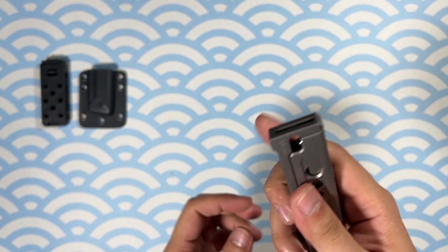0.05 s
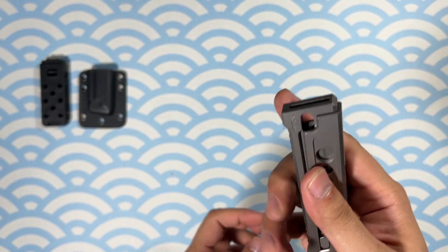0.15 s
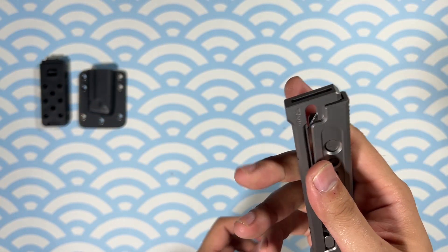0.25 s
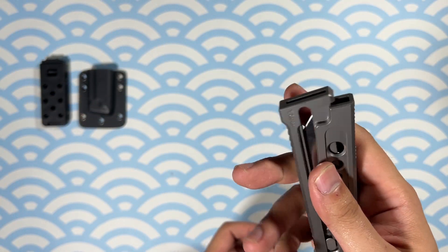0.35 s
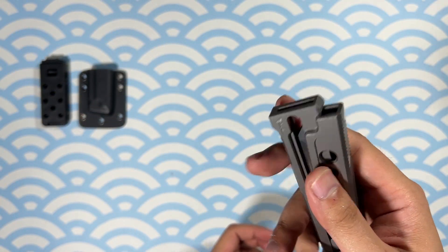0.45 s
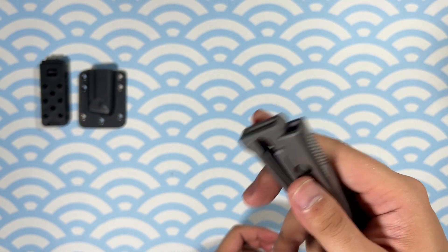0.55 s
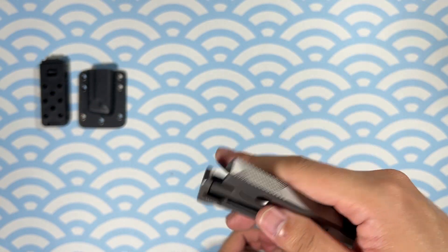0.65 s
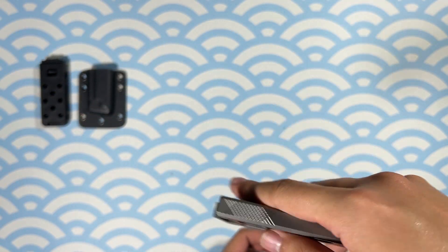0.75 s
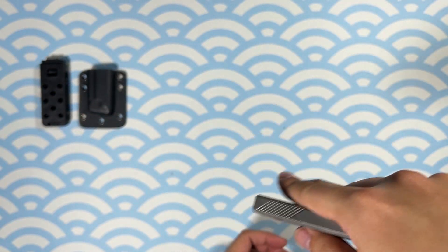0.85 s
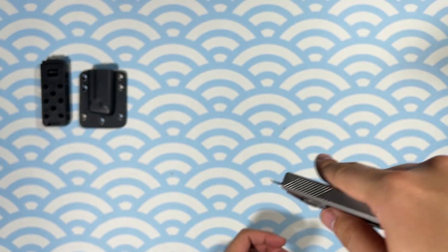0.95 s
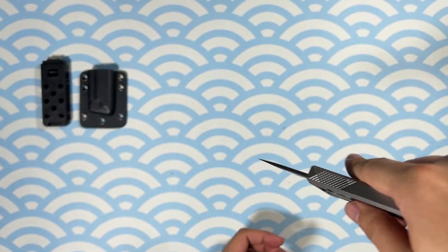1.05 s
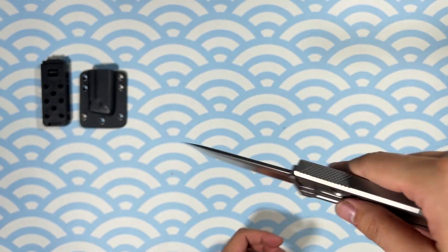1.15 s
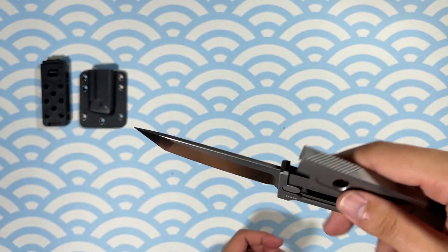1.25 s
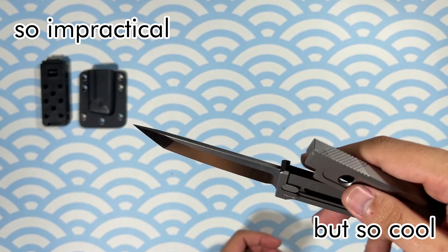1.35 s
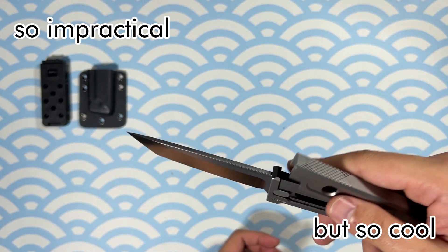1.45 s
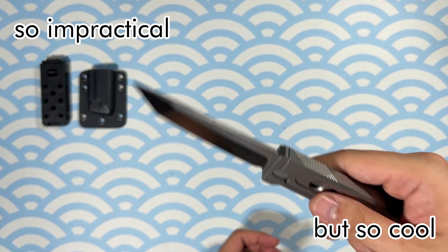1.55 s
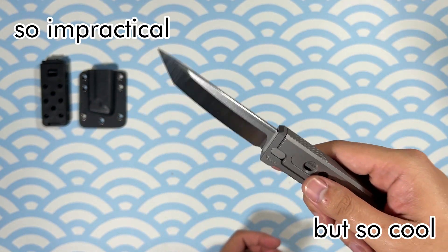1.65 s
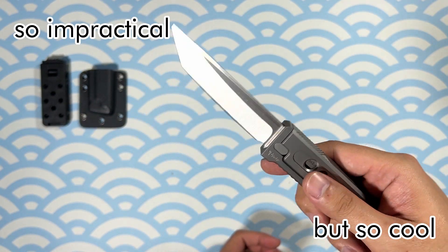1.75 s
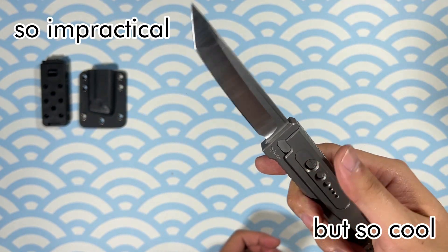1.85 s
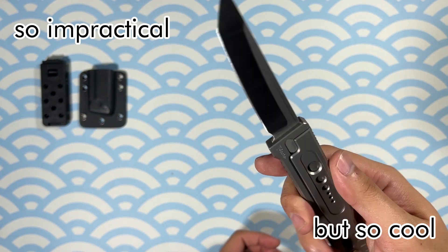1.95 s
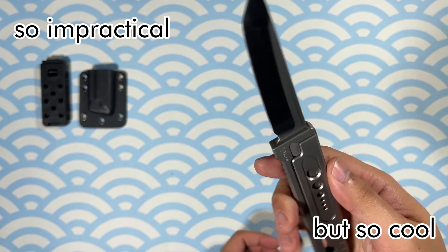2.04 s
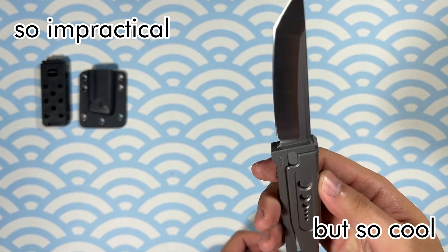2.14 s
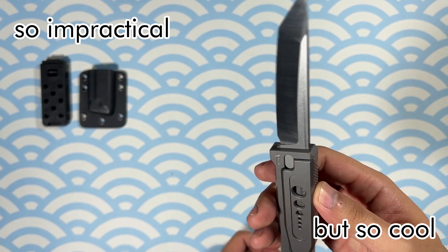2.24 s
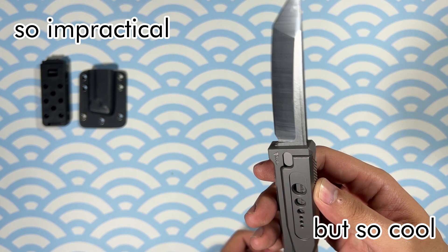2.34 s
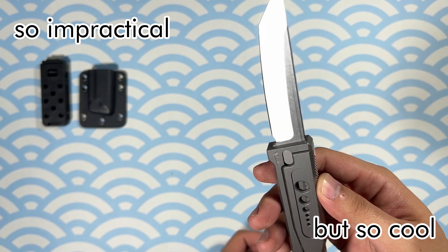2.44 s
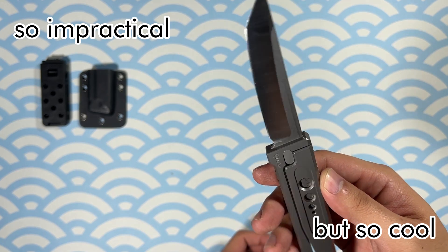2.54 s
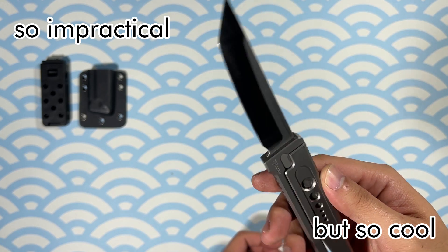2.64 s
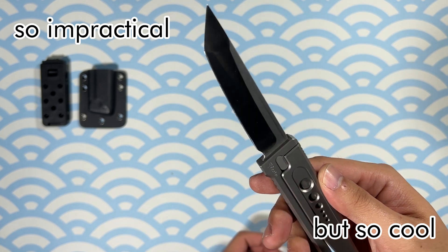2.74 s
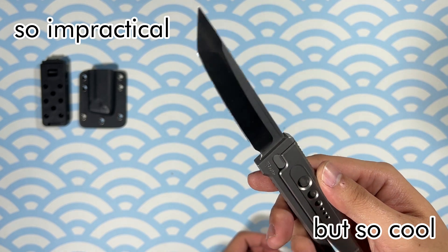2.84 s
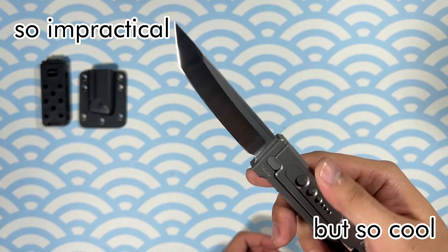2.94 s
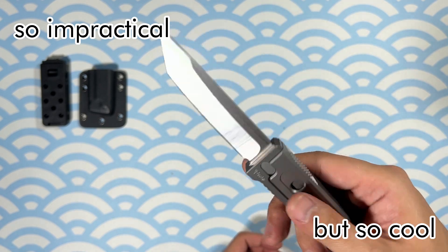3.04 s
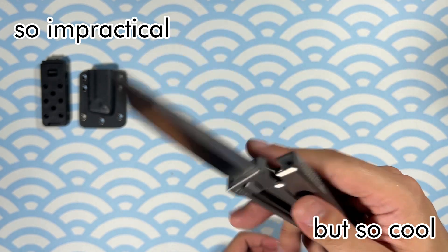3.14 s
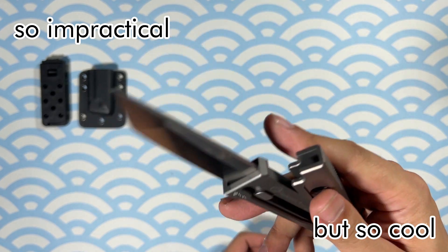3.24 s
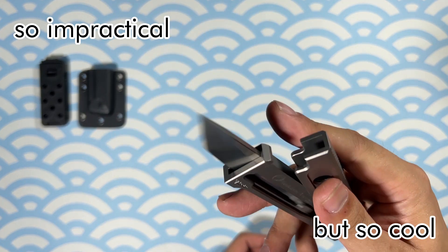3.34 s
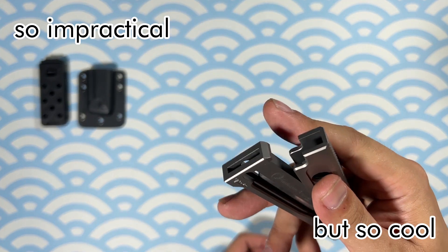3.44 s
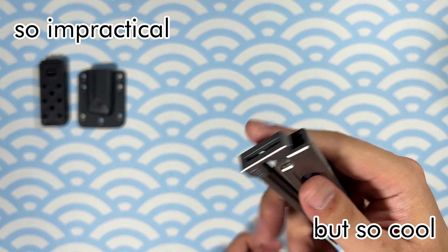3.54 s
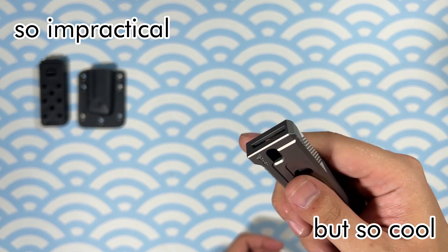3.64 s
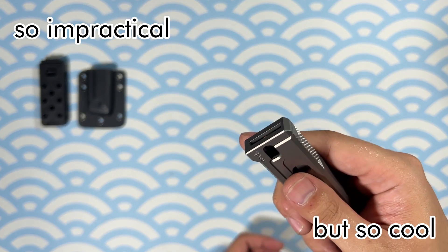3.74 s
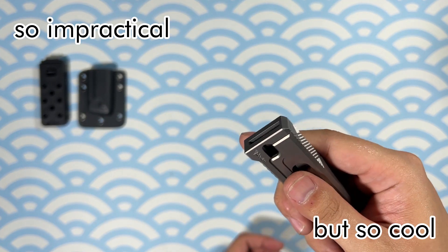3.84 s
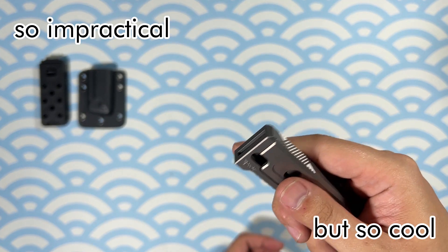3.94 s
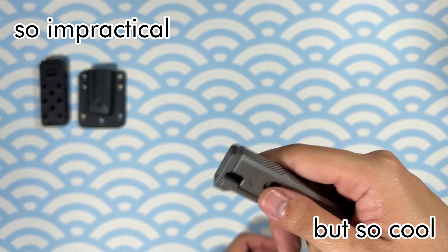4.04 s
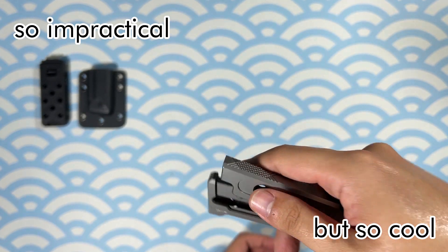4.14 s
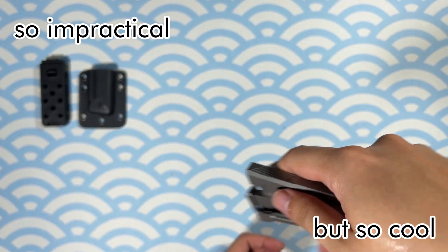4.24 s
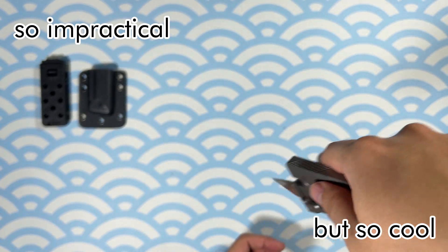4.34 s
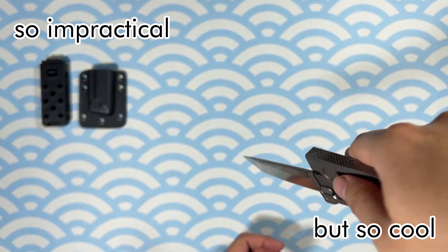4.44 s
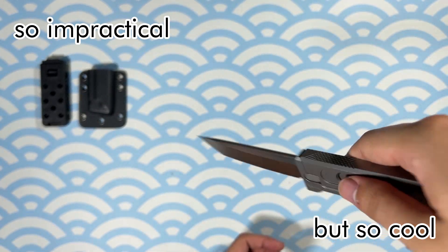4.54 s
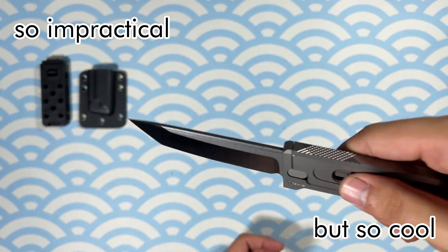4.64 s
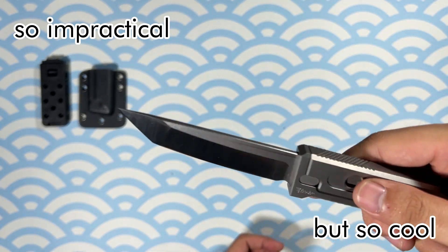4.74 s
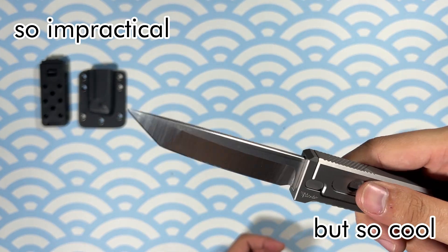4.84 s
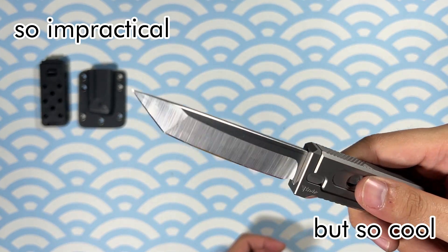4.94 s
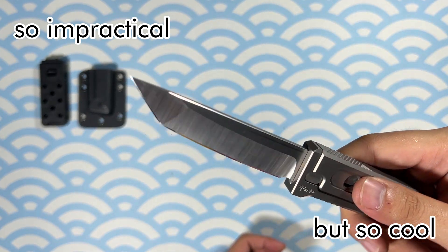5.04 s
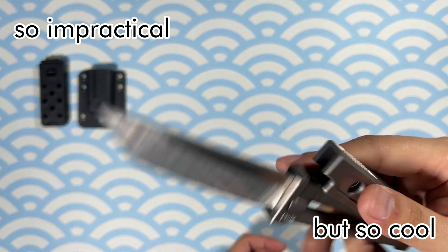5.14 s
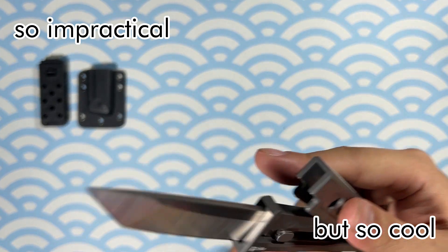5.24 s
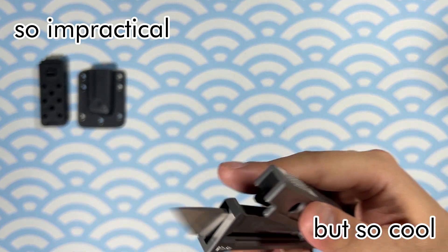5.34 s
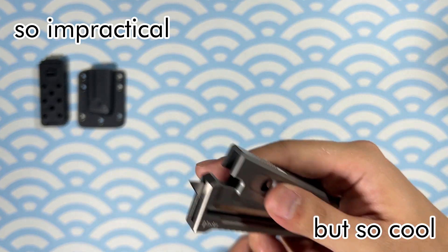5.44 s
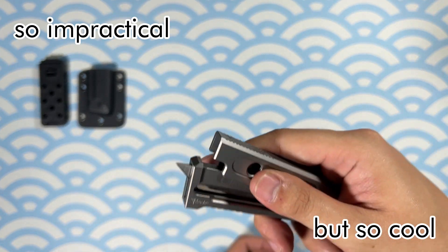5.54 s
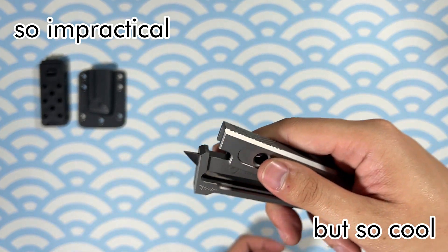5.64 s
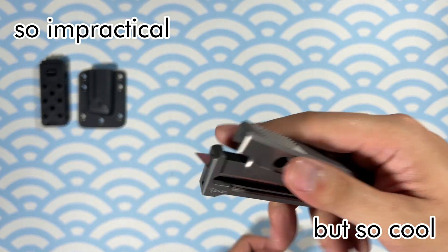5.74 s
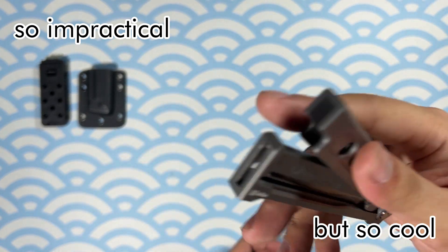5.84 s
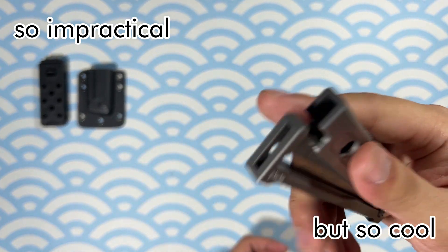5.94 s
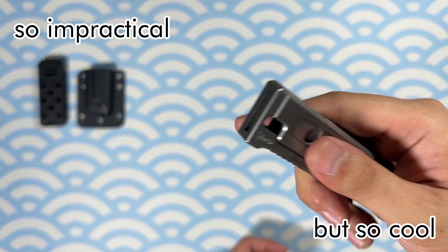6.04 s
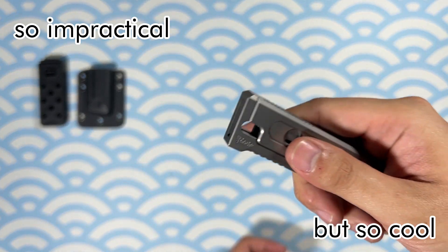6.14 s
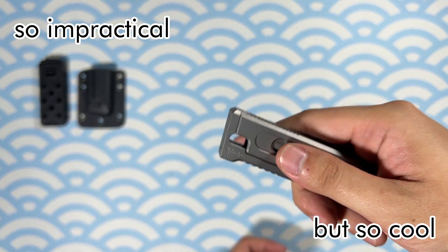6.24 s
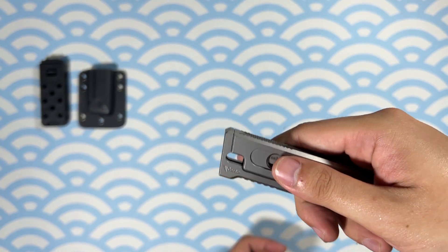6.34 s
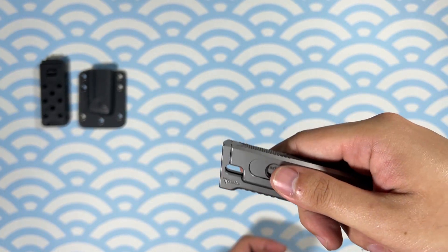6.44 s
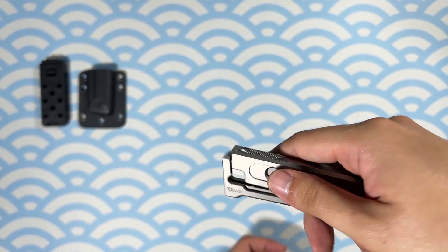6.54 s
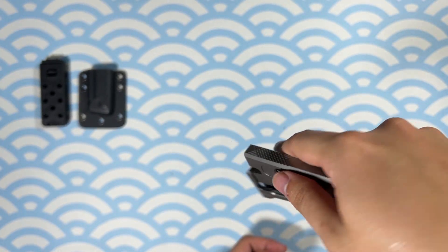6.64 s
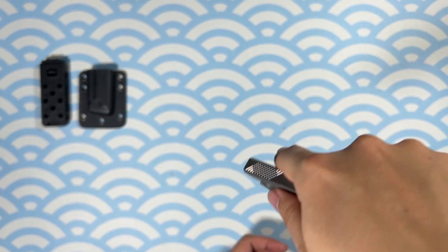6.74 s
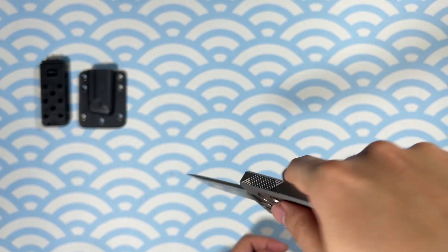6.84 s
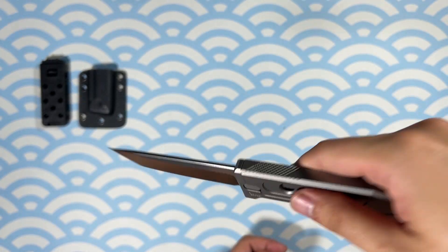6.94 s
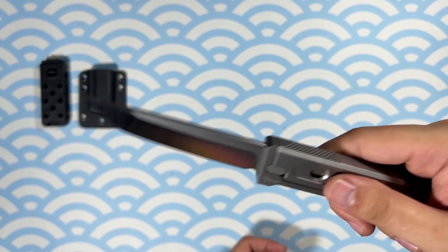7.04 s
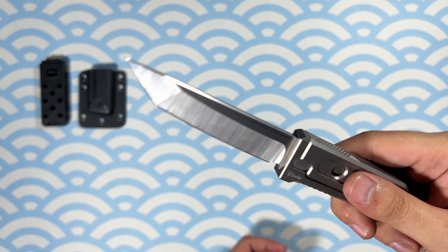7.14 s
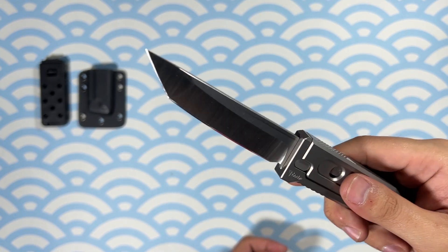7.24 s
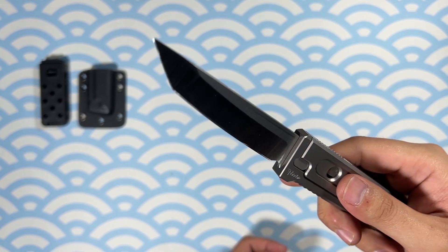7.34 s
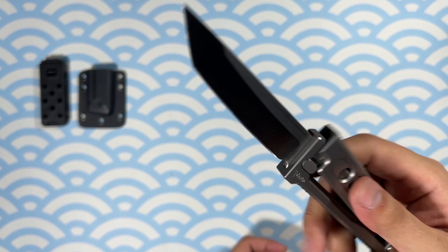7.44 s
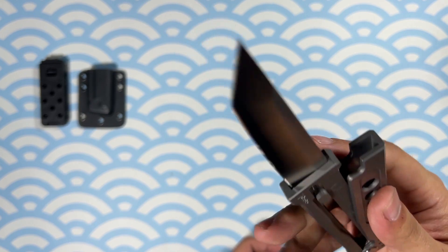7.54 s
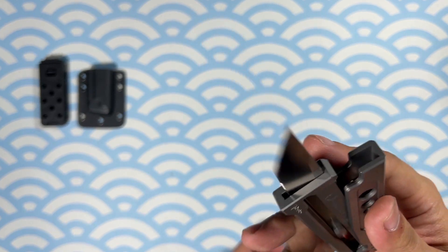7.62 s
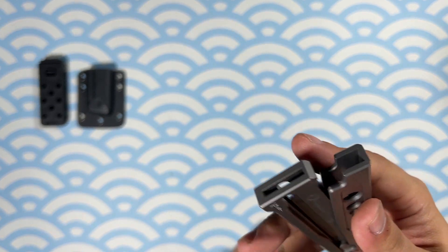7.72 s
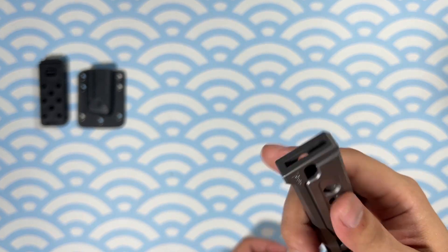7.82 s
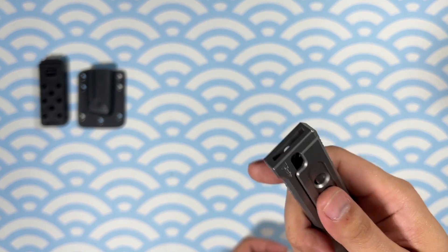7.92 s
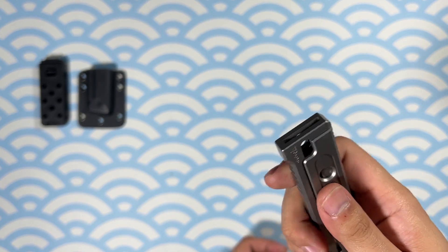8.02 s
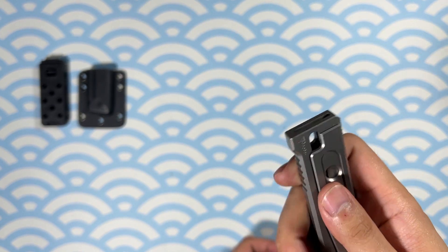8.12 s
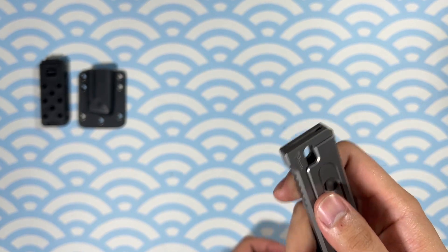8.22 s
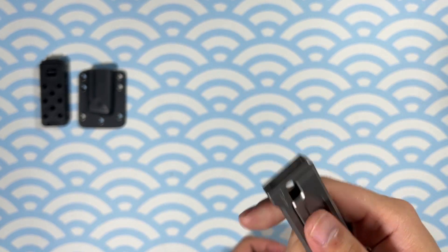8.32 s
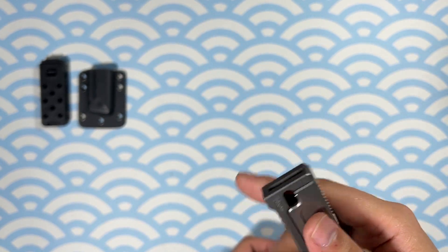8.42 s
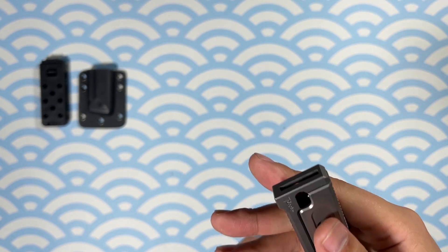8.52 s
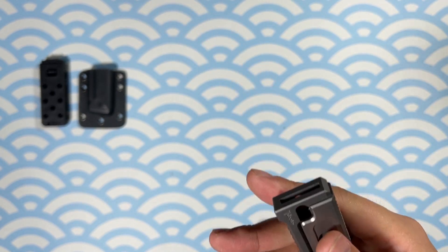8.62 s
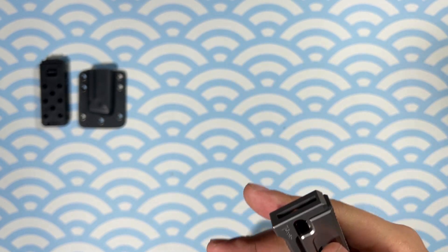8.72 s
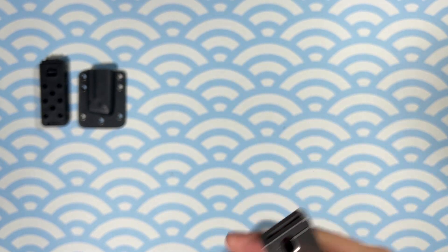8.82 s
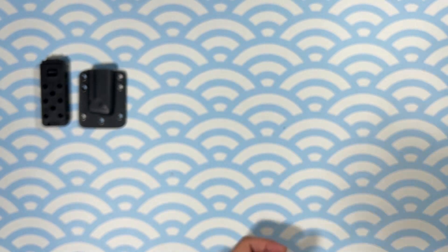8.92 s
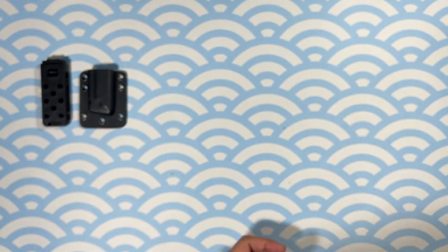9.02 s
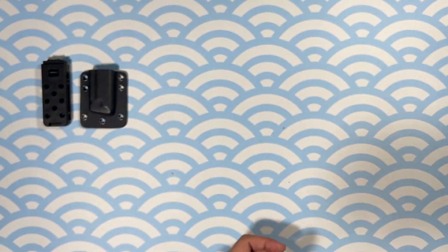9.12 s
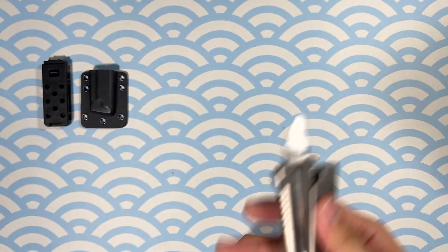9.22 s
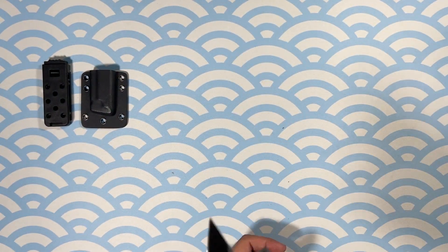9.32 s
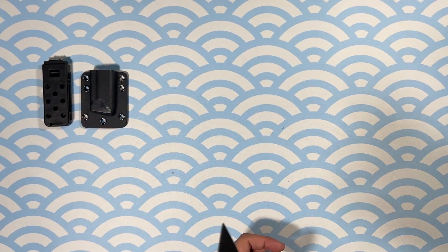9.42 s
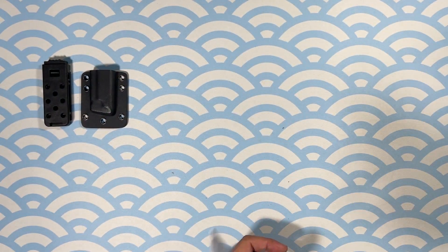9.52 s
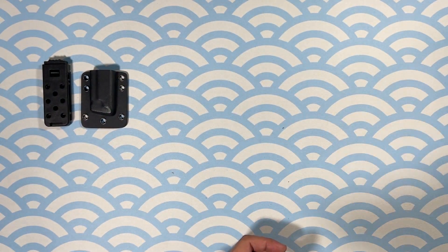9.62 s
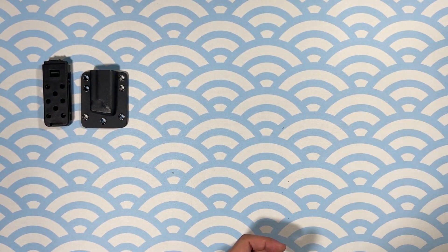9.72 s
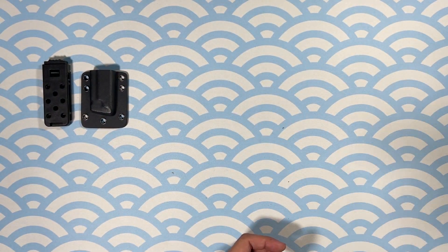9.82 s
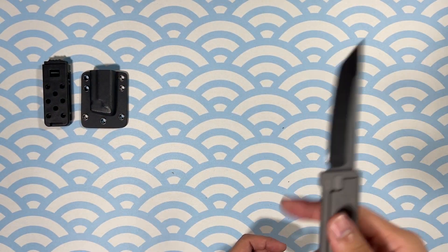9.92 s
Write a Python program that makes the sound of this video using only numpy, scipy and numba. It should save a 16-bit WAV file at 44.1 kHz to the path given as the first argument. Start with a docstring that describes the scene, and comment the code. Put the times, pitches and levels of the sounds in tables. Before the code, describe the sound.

A steel knife blade slides in and out of a hinged metal handle, close to the microphone in a small, quiet room. Light metallic ticks lead to a first clack at 0.8 seconds, then a short rasp and several bright, briefly ringing clacks between 1.2 and 1.8. After a pause, clicks and scraping begin at 3.2 and end in hard clacks at 3.6 and 3.8. A quick slide hits a sharp stop at 4.6, with a rattle and a low table thump. More scrapes, finger rubs and clacks follow from 5.3 to 6.2. Another slide lands with a rattling clack and thump at 7, and two sharp snaps come around 8. Final clacks fall at 9 and 9.4, trailing into small clicks. Underneath are a faint low hum, soft distant clock ticks each second, and two barely audible thin tones near 3.7 and 6.7.

```python
"""A sliding steel blade

Close to a microphone with two ports (left and right), a blade slides out of and back into a hinged
metal handle. Fingers tick on the metal, slides rasp, and each stop clacks and sets both parts ringing.
Hard stops thump through the table. The small room hums, a wall clock steps, two thin tones pass."""
import sys
import numpy as np
from scipy import signal
from scipy.fft import rfft, irfft, next_fast_len
from scipy.io import wavfile
from numba import njit

SR = 44100
rng = np.random.default_rng(int(sys.argv[2]) if len(sys.argv) > 2 else 0)


def pcm_store(signal):
    """Save signal as 16-bit PCM."""
    levels = np.round(np.clip(np.atleast_2d(signal), -1, 1) * 32767)
    wavfile.write(sys.argv[1], SR, levels.astype(np.int16).T)


N = 439677

# steady tones of a motor: f/Hz, level/dB
HUM_LINES = [(56.3, -54), (168.9, -78)]
# colour of the room's air (how strong each pitch is): f/Hz, level/dB
AIR_COLOUR = [(30, -28.5), (45, -10.5), (65, 0), (120, -6), (250, -18), (500, -23.5), (1000, -34),
              (1700, -33.5), (2500, -40.5), (5000, -42.5), (7000, -41.5), (8500, -52), (16000, -56.5)]
# how alike the air is left and right: f/Hz, likeness (1 is the same, 0 or less is unrelated)
AIR_LIKENESS = [(60, 0.63), (180, 0.94), (550, -0.55), (1650, 0.28), (4970, -4.5), (15000, -1.2)]
# colour of a clock tick: f/Hz, level/dB
TICK_COLOUR = [(240, -52), (400, -17), (431, -26), (849, -7.5), (1530, -9.5), (1730, -2), (2040, -15.5),
               (5220, -22.5), (8000, -39), (10400, -74.5), (17600, -120)]
# colour of a contact on the metal: f/Hz, level/dB
METAL_COLOUR = [(200, -69.5), (400, -53), (800, -53), (1250, -19.5), (2050, -12.5), (2500, -9), (4100, 6.5),
                (6000, -1), (7400, -0.5), (10100, 1), (12700, 3), (14000, -12), (15700, -3.5), (16300, -32),
                (17500, -60)]
# the blade's modes (pitches it rings at): f/Hz, level/dB, t60/s (time to fade by 60 dB)
BLADE_MODES = [(3140, -8, .12), (3623, -15, .1), (3871, -14, .1), (5090, -7, .1), (5420, -10, .12),
               (5733, -2, .2), (5825, -10, .15), (7413, -2, .2), (7460, -8, .2), (9480, -16, .12),
               (13140, -20, .12)]
# the handle's modes: f/Hz, level/dB, t60/s
HANDLE_MODES = [(2430, -2, .1), (2475, -5, .08), (3740, -13, .06), (4420, -10, .06), (4750, -11, .05),
                (5160, -9, .07), (6490, -7, .07), (7420, -3, .09), (7530, -4, .08), (2620, -1, .08),
                (8650, -14, .06), (12450, -16, .06), (13100, -16, .06)]
# light touches of metal on metal; dull and bright set the low and high part against the middle:
# t/s, force/dB, dull/dB, bright/dB, struck spot f/Hz
TOUCHES = [(0.163, -64, 18.5, -36, 3900), (0.278, -35, -23, -25, 3690), (0.334, -48.5, -3, -17, 3780),
           (0.389, -31.5, 7, -1, 6980), (0.5729, -37, 1, -6, 4090), (0.831, -44, 13, -8, 2840),
           (1.436, -40.5, 16.5, -17, 7570), (1.4575, -45, 6.5, -12, 4870), (1.4733, -34.5, 7, -8, 4444),
           (1.673, -51.5, 10, -26, 4130), (1.69, -50, 21, -13, 3874), (1.801, -32.5, 1.5, -5.5, 4570),
           (3.164, -51.5, 10.5, -28, 2860), (3.281, -52.5, 19, -10.5, 2663), (3.3093, -30.5, 4, -13, 5110),
           (3.3506, -31, -3.5, -7, 7420), (3.3737, -31.5, -21, 9, 3620), (3.4116, -34.5, -6.5, 11, 4370),
           (3.4384, -33, -0.5, 6, 6930), (3.7585, -39.5, 19, 17, 7400), (4.2308, -64, 16.5, -18, 2520),
           (4.26, -51, -5, -15.5, 2660), (4.396, -51.5, 6.5, -14, 4590), (4.4062, -47.5, 16.5, -26, 3635),
           (4.571, -44, -13, -8, 7700), (5.258, -44.5, 13.5, -19, 3730), (5.291, -41.5, 15.5, -28, 4660),
           (5.372, -35, 12, 10, 8060), (5.3891, -27.5, -25, 10.5, 7000), (5.4265, -49, -9, 22, 3370),
           (5.477, -32.5, 7.5, 13, 7250), (5.9243, -39.5, -2, -15, 3820), (5.9599, -33.5, -6, -13, 4480),
           (6.0283, -33.5, 2, -20.5, 7470), (6.147, -33.5, 10.5, -11, 3896), (6.4933, -68, 17, -27, 2477),
           (6.756, -51, -7, -1, 3356), (6.843, -43.5, -8.5, -28, 3650), (7.5797, -47.5, 9.5, -22, 2600),
           (7.6242, -31, 6, -26, 4680), (7.7824, -39, -27, 20, 3200), (8.394, -65.5, 18, -35, 3287),
           (8.4377, -69, 19, -31, 3725), (8.542, -57, 15, -26, 3850), (8.9931, -47, 4.5, -20, 7100),
           (9.1866, -54.5, 11, -21, 7350), (9.214, -46, -1, -23, 4020), (9.3628, -35.5, -1, -28, 3650),
           (9.3762, -25, 6, -17, 3930), (9.4323, -24, -8, 2, 5050), (9.5527, -33.5, -7, -5, 3840),
           (9.5832, -32, 12, -20, 7340), (9.5912, -30, -15, -4, 5500), (9.6832, -52.5, 18, -23, 3450),
           (9.7619, -46.5, -1, -25, 3720), (9.7893, -65, 26, -28.5, 3630), (9.839, -54, 12, -26, 3730),
           (9.9264, -53.5, 14, -35, 3690)]
# hard stops of blade, latch and handle:
# t/s, force/dB, dull/dB, bright/dB, chatter t60/s, blade ring/dB, spot ring/dB, spot f/Hz
STOPS = [(0.7566, -20, 2, -16, 0.0066, -48, -61, 7760),
         (1.1667, -16.5, 3.5, -19.5, 0.011, -39.5, -27.5, 5360),
         (1.2348, -28.5, 8.5, -18.5, 0.021, -29, -13, 4900), (1.365, -12, -2.5, 7, 0.015, -37, -11, 7470),
         (1.7239, -15.5, 7, -9, 0.022, -51, -15.5, 2680), (3.6072, -7.5, 5.5, -3.5, 0.023, -14, -26, 5660),
         (3.6226, -15, -12.5, -14.5, 0.026, -35, -25, 5840),
         (3.7626, -2, -1.5, -5.5, 0.016, -35.5, -29.5, 4640),
         (4.6327, -3, -22.5, 3.5, 0.011, -24, -20, 7360), (4.7504, -26.5, 11.5, -30, 0.013, -40, -19, 7460),
         (5.5692, -14.5, 4, -5, 0.034, -38, -34.5, 4380), (6.07, -12.5, -4.5, 0, 0.017, -43.5, -15, 3290),
         (6.1739, -4, 2.5, -9, 0.023, -41, -22, 7430), (7.0276, -7.5, -10.5, -6.5, 0.028, -45.5, -23, 4080),
         (7.1123, -18.5, 7, 3, 0.0092, -27.5, -5.5, 2660),
         (7.7097, -26.5, -14.5, 16.5, 0.013, -33.5, -20.5, 3720),
         (7.8804, -2.5, -3, 4, 0.0088, -29, -19.5, 7740), (8.0244, -5, 1.5, 2, 0.018, -31.5, -25.5, 6820),
         (8.6194, -31.5, -2, -10.5, 0.02, -41.5, -13, 4020),
         (9.0187, -12.5, -5, -3, 0.013, -38, -24.5, 2590), (9.3827, -8, 0.5, -4, 0.027, -40, -15, 4170)]
# fingers rub the handle: loudest t/s, length/s, level/dB, dull/dB, bright/dB, groove f/Hz
RUBS = [(0.295, 0.11, -76, 2, -10, 3970), (0.532, 0.058, -66.5, 13, -14, 4000),
        (1.708, 0.094, -59, 8.5, -13.5, 4200), (4.298, 0.095, -62, 13, -9.5, 3490),
        (5.975, 0.095, -48.5, 1, -7.5, 3840), (6.057, 0.067, -55.5, -2, 3.5, 4100),
        (6.1, 0.084, -55, -17, -6, 4000), (6.167, 0.044, -35, 7.5, -12.5, 4200),
        (9.252, 0.09, -43.5, -4, -6, 3520), (9.887, 0.085, -57.5, 3.5, -16, 3470)]
# the blade runs along its groove: start t/s, end t/s, start level/dB, end level/dB,
# dull/dB, bright/dB, groove level/dB, groove start f/Hz, groove end f/Hz
SLIDES = [(1.024, 1.154, -77.5, -53, 5, -16, -62, 3830, 4520),
          (1.23, 1.373, -46, -51.5, -6, -12, -39.5, 4370, 3800),
          (3.308, 3.384, -52.5, -53, 1.5, -5, -42.5, 4420, 3700),
          (3.421, 3.615, -51.5, -45, -10, 5, -42.5, 3630, 4170),
          (4.428, 4.629, -66, -40, -4, -4, -55, 3480, 4000),
          (5.292, 5.404, -51.5, -43.5, 4, -9, -58, 4060, 3900),
          (5.428, 5.565, -44, -47.5, -4, 3.5, -44.5, 4030, 4340),
          (6.761, 7.026, -71.5, -44, -2.5, -10, -46.5, 3450, 4470),
          (7.705, 7.915, -47, -51.5, -5, 0.5, -41.5, 3900, 4540)]
# loose parts rattle on after a blow: t/s, length/s, start level/dB, dull/dB, bright/dB
RATTLES = [(1.166, .045, -41, -7.5, -9), (1.43, .07, -52, 1.5, -2.5), (3.612, 0.09, -34, -3, -15.5),
           (4.644, 0.0845, -27.5, -7, -7), (7.027, 0.1, -23.5, -10, -3.5), (7.63, 0.062, -50.5, 6, -3),
           (7.896, 0.078, -31, 5.5, -6)]
# tones of the hollow groove that guides the blade: multiple of its pitch, level/dB
GROOVE_TONES = [(1, -0.5), (2.049, -10), (3.2, -7)]
# jolts through the table: t/s, level/dB
THUMPS = [(3.616, -46), (4.642, -36), (6.177, -60), (7.038, -42.5), (7.884, -60), (8.031, -53),
          (9.021, -62.5), (9.391, -44)]
# faint tones from far off: t/s, length/s, f/Hz, level/dB
FAR_TONES = [(3.7, 0.31, 579.4, -78), (6.697, 0.18, 996, -80.5)]
# how long the room's tail of echoes lasts: f/Hz, t60/s
ROOM_DECAY = [(300, 0.18), (1500, .3), (4000, 0.28), (8000, 0.27), (15000, .24)]
# the part of that tail that differs left and right: f/Hz, level/dB
WIDE_COLOUR = [(300, -2.5), (800, -6.5), (1500, -14.5), (3000, -13.5), (5500, 0), (8000, -14), (10000, -31)]

LOWEST_HZ = 1100   # so small a body gives off little sound below this
DULL_HZ, BRIGHT_HZ = 3351, 10800   # borders of the metal's low, middle and high part
HZ = np.maximum(np.fft.rfftfreq(2 * next_fast_len((N + SR) // 2), 1 / SR), 1)   # pitches for filters
FFT_SIZE = 2 * (len(HZ) - 1)


def from_db(db):
    """Turn decibels into a gain."""
    return 10 ** (np.asarray(db) / 20)


def rms_one(x):
    """Scale a sound to an average power of 1."""
    return x / np.sqrt(np.mean(x ** 2) + 1e-20)


def at_hz(points, hz):
    """Read between the rows of a table of pitches."""
    return np.interp(np.log(hz), np.log(np.array(points)[:, 0]), np.array(points)[:, 1])


def through(x, response):
    """Filter with one gain for each pitch in HZ."""
    return irfft(rfft(x, FFT_SIZE) * response, FFT_SIZE)[..., :N]


def keep_band(x, order, hz, kind):
    """Let one range of pitches through; a higher order cuts more steeply."""
    return signal.sosfilt(signal.butter(order, hz, kind, fs=SR, output="sos"), x)


def causal(colour):
    """Turn a colour into a filter that lets nothing sound early (minimum phase)."""
    cepstrum = irfft(np.log(from_db(at_hz(colour, HZ))))
    cepstrum[1:len(HZ) - 1] *= 2
    cepstrum[len(HZ):] = 0
    return np.exp(rfft(cepstrum))


def drift(rate_hz):
    """A smooth random wobble, about 1 in size."""
    r = np.exp(-2 * np.pi * rate_hz / SR)
    return rms_one(signal.lfilter([1], [1, -2 * r, r * r], rng.standard_normal(N + SR)))[SR:]


def ring(drive, hz, t60):
    """Each click in the drive starts a fading sine of the same height."""
    r, w = from_db(-60 / (t60 * SR)), 2 * np.pi * hz / SR
    return signal.lfilter([0, np.sin(w)], [1, -2 * r * np.cos(w), r * r], drive + 1e-18)


@njit
def moving_ring(drive, hz, width_hz):
    """A ring whose pitch can glide."""
    r, out = np.exp(-np.pi * width_hz / SR), np.zeros(len(drive))
    for i in range(2, len(drive)):
        feedback = 2 * r * np.cos(2 * np.pi * hz[i] / SR)
        out[i] = (1 - r) * drive[i] + feedback * out[i - 1] - r * r * out[i - 2]
    return out


def hum():
    """A motor's steady tones waver slightly, a little louder on the left."""
    turn = 2 * np.pi * np.arange(N) / SR + 0.0014 * drift(4.0)
    motor = sum(np.sqrt(2) * from_db(db + .6 * drift(3.6)) * np.sin(hz * turn) for hz, db in HUM_LINES)
    return motor * from_db([[.9], [-.9]])


def air(level_db=-65):
    """Steady rumble and hiss, alike at both ports mainly in the bass."""
    alike, colour = np.clip(at_hz(AIR_LIKENESS, HZ), 0, 1), from_db(at_hz(AIR_COLOUR, HZ))
    mid = through(rng.standard_normal(N), colour * np.sqrt(1 + alike))
    side = through(rng.standard_normal(N), colour * np.sqrt(1 - alike))
    return from_db(level_db) * rms_one(np.array([mid + side, mid - side]))


def clock(first_s=-0.0038, every_s=1.0, rise_s=.01, fall_s=.035):
    """Far steps of the second hand, smeared by the room into soft puffs."""
    age = (np.arange(N) / SR - first_s) % every_s
    puffs = from_db(-56.5) * (1 - np.exp(-age / rise_s)) * np.exp(-age / fall_s)
    return puffs * rms_one(through(rng.standard_normal((2, N)), from_db(at_hz(TICK_COLOUR, HZ))))


def clacks(touch_t60=0.014, touch_blade_db=-34, touch_spot_db=-15, handle_db=-33, scatter_db=2.5):
    """Each contact is a short chatter of force; the struck spot rings briefly, blade and handle longer."""
    contacts = STOPS + [(s, db, dull_db, bright_db, touch_t60, touch_blade_db, touch_spot_db, hz)
                        for s, db, dull_db, bright_db, hz in TOUCHES]
    span = 2000   # samples for one contact
    force, rings = np.zeros((3, N + span)), np.zeros(N + span)
    t = np.arange(span) / SR
    attack = 1 - np.exp(-t / 0.00044)
    for s, db, dull_db, bright_db, t60, _, spot_db, hz in contacts:
        i = round(s * SR)
        chatter = rng.standard_normal(span) * attack * from_db(db - 60 * t / t60)
        force[:, i:i + span] += chatter * from_db([[dull_db], [0], [bright_db]])
        rings[i:i + span] += ring(chatter * from_db(spot_db), hz, t60=.008)   # fingers damp the spot
    s, db, dull_db, _, _, blade_db, _, _ = np.transpose(contacts)
    starts, rings = np.round((s + 0.0015) * SR).astype(int), rings[:N]
    modes = BLADE_MODES + HANDLE_MODES
    scatter = scatter_db * rng.standard_normal((len(contacts), len(modes)))
    grip_db = 0.077 * db   # the grip damps light touches more
    for k, (hz, mode_db, t60) in enumerate(modes):
        part_db = blade_db if k < len(BLADE_MODES) else handle_db
        wake_db = (hz < DULL_HZ) * .6 * dull_db   # a dull blow wakes the low modes
        blows = np.zeros(N)
        blows[starts] = from_db(db + part_db + wake_db + grip_db + mode_db + scatter[:, k])
        rings += ring(blows, hz, t60)
    return force[:, :N], rings


def strokes(rattle_fall_db_per_s=152.5, rattle_hz=4700, rub_swell_db=18.5):
    """List each slide, rattle and rub: t/s, level/dB, groove f/Hz, then dull, bright and groove gain/dB."""
    for s, end, db, end_db, dull, bright, groove, hz, end_hz in SLIDES:
        yield [s, end], [db, end_db], [hz, end_hz], dull, bright, [groove - db, groove - end_db]
    for s, length, db, dull, bright in RATTLES:
        end_db = db - rattle_fall_db_per_s * length
        yield [s, s + length], [db, end_db], [rattle_hz] * 2, dull, bright, 4.5
    for s, length, db, dull, bright, hz in RUBS:
        swell_db = [db - rub_swell_db, db, db - rub_swell_db]
        yield [s - length / 2, s, s + length / 2], swell_db, [hz] * 3, dull, bright, 6


def rasp(grains_per_s=4000, waver_hz=20, waver_db=3.5, overtone_waver_db=6.5, sing_db=-30.5):
    """Rough edges catch in tiny uneven grains that hoot in the groove and make the handle sing."""
    time, groove_hz = np.arange(N) / SR, np.full(N, 3700.)
    level = np.zeros((4, N))   # dull, middle, bright, groove
    for s, db, hz, dull_db, bright_db, groove_db in strokes():
        now = slice(round((s[0] - .006) * SR), round((s[-1] + .012) * SR))
        fade = np.interp(time[now], [s[0] - .006, s[0], s[-1], s[-1] + 0.013], [0, 1, 1, 0])
        for k, part_db in enumerate((dull_db, 0, bright_db, groove_db)):
            level[k, now] += fade * from_db(np.interp(time[now], s, np.add(db, part_db)))
        groove_hz[now] = np.interp(time[now], s, hz)
    level *= from_db([waver_db * drift(waver_hz) for _ in level])   # each part wavers on its own
    sizes = from_db(2.5 * np.minimum(rng.exponential(1, N), 5)) * rng.choice([-1, 1], N)
    catches = rng.random(N) < grains_per_s / SR
    grains = rms_one(sizes * catches) * from_db(0.95 * drift(66))
    hoot = 0
    for multiple, db in GROOVE_TONES:
        gain = from_db(db + overtone_waver_db * (multiple > 1) * drift(waver_hz))
        pitch = multiple * groove_hz * (1 + .02 * drift(waver_hz))
        hoot += moving_ring(grains * level[3] * gain + 1e-18, pitch, width_hz=330)
    singing = sum(ring(grains * level[1] * from_db(db + sing_db), hz, .3 * t60)
                  for hz, db, t60 in HANDLE_MODES[6:9])
    return grains * level[:3], hoot + singing


def knife():
    """Blows and rubbing share the colour of the metal; the rings come on top."""
    blows, rings = clacks()
    rubbing, rasp_rings = rasp()
    dull, middle, bright = blows + rubbing + 1e-18
    force = (keep_band(dull, 2, [LOWEST_HZ, DULL_HZ], "band")
             + keep_band(middle, 3, [DULL_HZ, BRIGHT_HZ], "band")
             + keep_band(bright, 3, BRIGHT_HZ, "high"))
    colour = causal(METAL_COLOUR)
    colour /= np.sqrt(np.mean(np.abs(colour) ** 2))
    return through(force, colour) + keep_band(rings + rasp_rings, 4, LOWEST_HZ, "high")


def room(x, gap_s=0.0057, tail_db=-13.5, wide_pan_db=7, echo_s=0.0033, echo_db=-10, split_hz=5800):
    """The ports hear the direct sound, an echo off the table and a tail dying band by band."""
    t, tail = np.arange(SR // 2) / SR, 0
    white, edges = rng.standard_normal((3, SR // 2)), 250 * 2 ** np.arange(0, 6.6, .5)
    for low, high in zip(edges, edges[1:]):
        band = keep_band(white, 2, [low, min(high, .45 * SR)], "band")
        tail += band * from_db(-60 * t / at_hz(ROOM_DECAY, np.sqrt(low * high)))
    tail *= np.clip(t / gap_s - .5, 0, 1)   # the first walls answer after a gap
    tail = rfft(tail / np.sqrt(np.sum(tail[0] ** 2)), FFT_SIZE)
    wide = tail[1:] * from_db(at_hz(WIDE_COLOUR, HZ) + [[wide_pan_db / 2], [-wide_pan_db / 2]])
    echo = from_db(echo_db) * np.exp(-2j * np.pi * HZ * echo_s)
    near = 1 + echo + from_db(tail_db) * tail[0]
    treble = 1 / (1 + (split_hz / HZ) ** 8)
    lag_s, lead_s = .000148, .000035   # on the left, treble comes late round the casing, bass early
    left = treble * np.exp(-2j * np.pi * HZ * lag_s)
    left += (1 - treble) * from_db(-0.5) * np.exp(2j * np.pi * HZ * lead_s)
    echo_pan = (1 - treble) * echo * [[.6], [-.6]]
    return through(x, np.array([near * left, near]) + wide + echo_pan)


def thumps(table_hz=64):
    """A hard stop shakes the table under the microphone."""
    jolts = np.zeros(N)
    for s, db in THUMPS:
        jolts[round(s * SR)] = from_db(db)
    push = signal.lfilter([.03], [1, -.97], jolts + 1e-18)   # softened by hand and wood
    return (ring(push, table_hz, t60=0.21)
            + from_db(-3.5) * ring(push, 2.1 * table_hz, t60=0.12)
            + from_db(7.5) * ring(push, 5.0 * table_hz, t60=0.01))


def far_tones(fade_s=0.02):
    """Two thin tones swell in, waver and fade."""
    time, out = np.arange(N) / SR, 0
    for s, length, hz, db in FAR_TONES:
        shape = np.interp(time, [s, s + fade_s, s + length - fade_s, s + length], [0, 1, 1, 0])
        out += shape * np.sqrt(2) * from_db(db + 2.5 * drift(12)) * np.sin(2 * np.pi * hz * time)
    return out


def scene():
    """The knife in its room, over the table's thumps and the quiet background."""
    return room(knife()) + thumps() + clock() + hum() + air() + far_tones()


def record(dry, cutoff_hz=16900):
    """The highest peaks are rounded and the top treble is cut."""
    return signal.sosfilt(signal.cheby2(12, 70, cutoff_hz, fs=SR, output="sos"), np.tanh(dry))


dry = scene()
out = record(dry)
pcm_store(out)
```